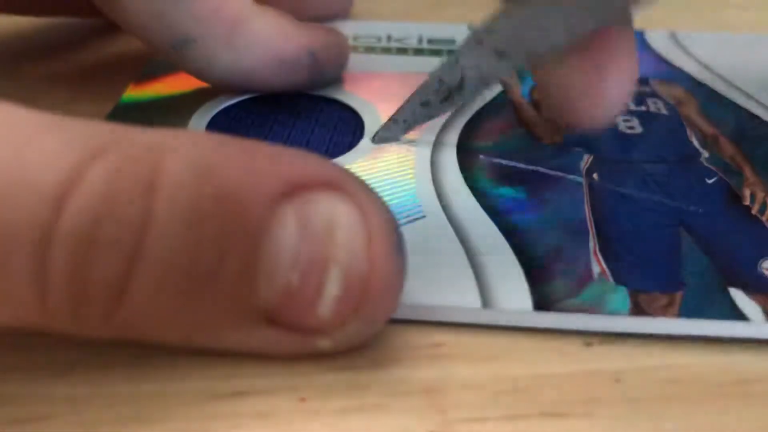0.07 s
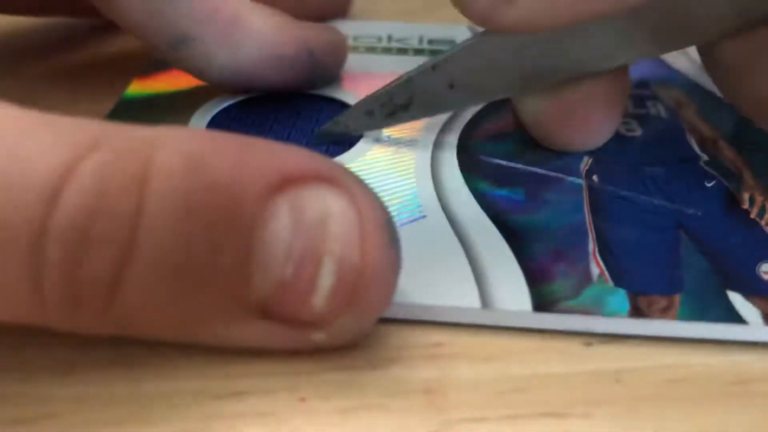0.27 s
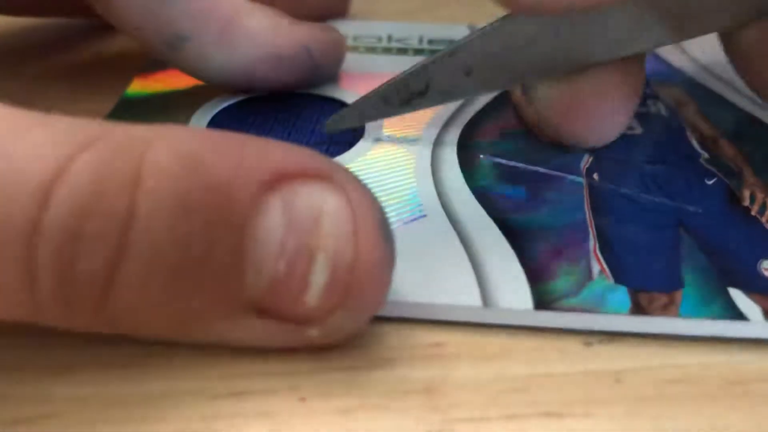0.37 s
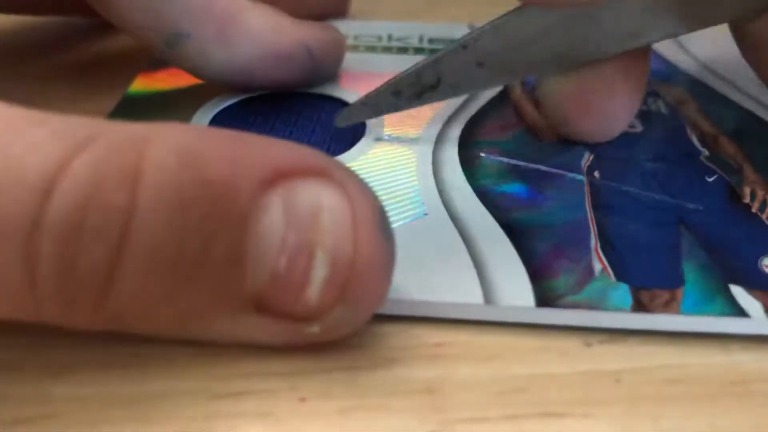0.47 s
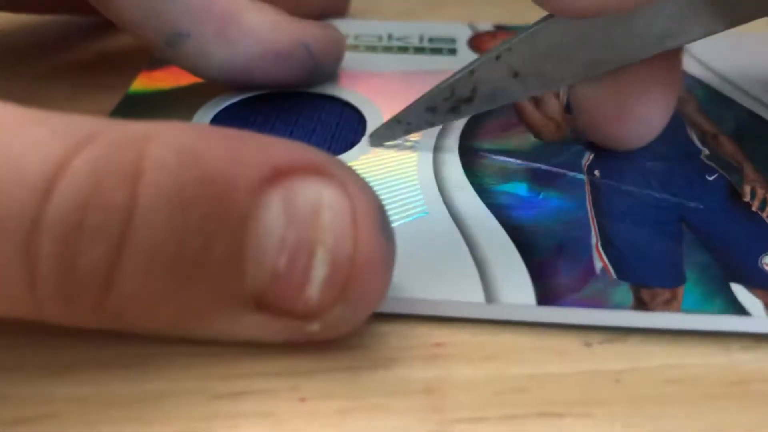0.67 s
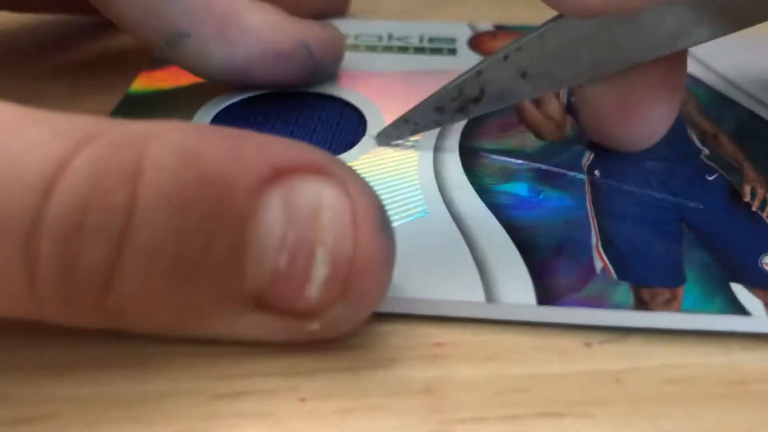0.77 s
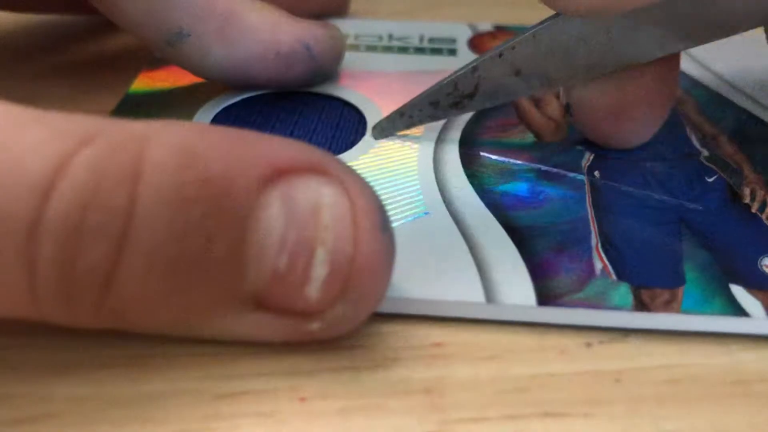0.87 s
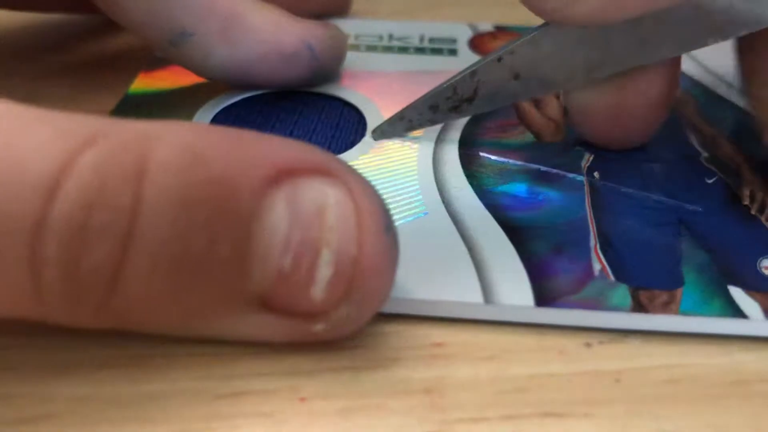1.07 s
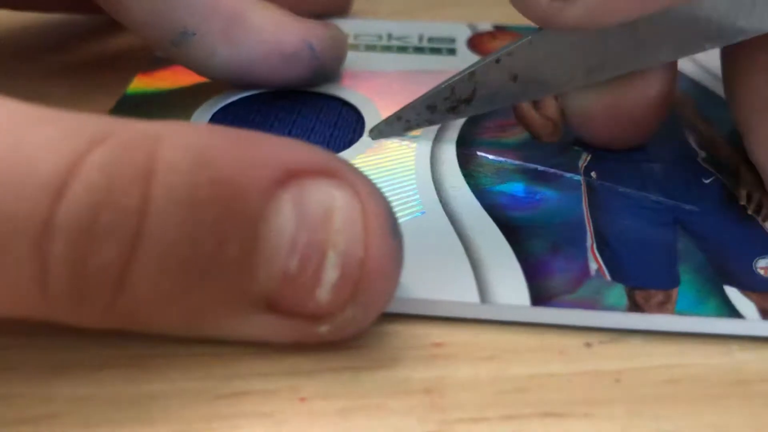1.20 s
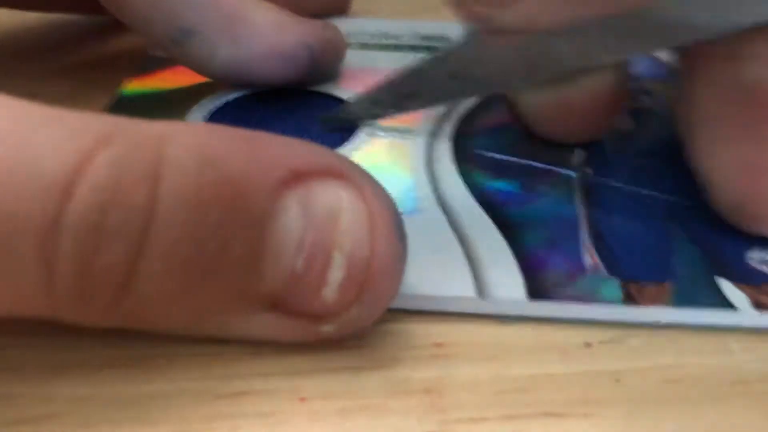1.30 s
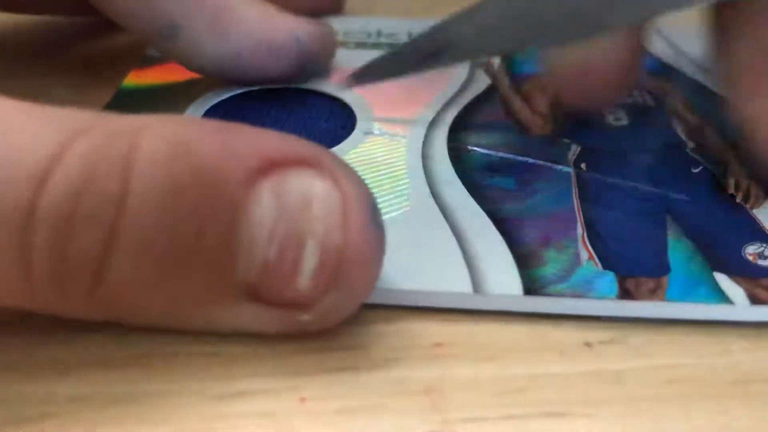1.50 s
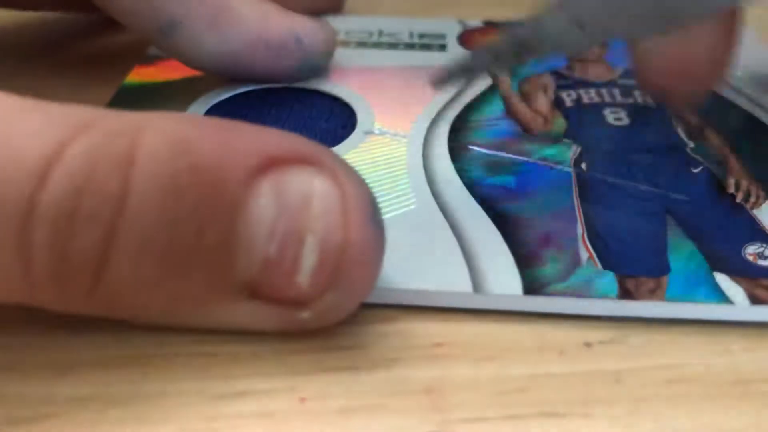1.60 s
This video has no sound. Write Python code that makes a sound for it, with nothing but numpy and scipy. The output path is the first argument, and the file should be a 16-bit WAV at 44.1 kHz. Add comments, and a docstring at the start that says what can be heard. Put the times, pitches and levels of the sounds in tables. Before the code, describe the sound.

Dry clicks and short scrapes of a pointed blade picking at a card on a table.

```python
"""A wooden table in a small room, one microphone close to a stiff trading card held down on it.
A pointed blade scrapes briefly and slides with a faint hiss and tiny metallic ticks. At 0.2 s the tip
catches and lets go in a flurry: the card snaps, clacks and thuds on the table, treble before bass.
A quieter second follows, with a scrape, light catches, ticks and soft nudges of the fingers.
At 1.33 s comes a second flurry, then two last faint scrapes and catches."""
import sys
import numpy as np
from scipy import signal
from scipy.fft import rfft, irfft
from scipy.io import wavfile

SR = 44100
rng = np.random.default_rng(int(sys.argv[2]) if len(sys.argv) > 2 else 0)


def store_pcm(level_fs):
    """Save levels as 16-bit WAV."""
    pcm = np.round(np.clip(level_fs, -1, 1) * 32767).astype(np.int16)
    wavfile.write(sys.argv[1], SR, np.atleast_2d(pcm).T)


N = 72765
TAPS = 4096  # samples in an impulse response
BLOW_GAIN = np.sqrt(0.003 * SR)  # gives a blow of energy one an rms of one over 3 ms


def amp(db):
    """Decibels to gain."""
    return 10 ** (np.asarray(db) / 20)


def curve_at(points, hz):
    """Interpolates a curve on a log-frequency axis."""
    point_hz, value = np.transpose(points)
    return np.interp(np.log(hz + 1), np.log(point_hz + 1), value)


def add(mix, start_s, sound):
    """Mixes a sound in at its time."""
    part = mix[max(round(start_s * SR), 0):][:len(sound)]
    part += sound[:len(part)]


def unit(x):
    """Scales to energy one."""
    return x / np.sqrt(np.sum(x ** 2) + 1e-20)


def impulse(colour):
    """Impulse response with the given colour and no pre-echo."""
    log_gain = np.log(amp(curve_at(colour, abs(np.fft.fftfreq(TAPS, 1 / SR)))))
    return unit(np.fft.ifft(np.exp(np.conj(signal.hilbert(log_gain)))).real)


def noise(colour):
    """Steady noise of rms one with the given colour."""
    gain = amp(curve_at(colour, np.fft.rfftfreq(N, 1 / SR)))
    return unit(irfft(rfft(rng.standard_normal(N)) * gain, N)) * np.sqrt(N)


def ring(modes, sign=1):
    """Damped modes; with a negative sign neighbours move in opposition and the ring swells in."""
    t = np.arange(TAPS) / SR
    return unit(sum(sign ** k * amp(db) * width * np.exp(-np.pi * width * t) * np.sin(2 * np.pi * hz * t)
                    for k, (hz, width, db) in enumerate(modes)))


# Antiresonances of card and table. Each row: frequency in Hz, width in Hz.
DIPS = [(420, 65), (1100, 100)]
def bending_wave(x, band_hz, delay_s=0.001):
    """Bending waves bring the bass late (delay_s holds at 1 kHz); only a band with two dips radiates."""
    hz = np.fft.rfftfreq(2 * TAPS, 1 / SR)
    phase_lag = 4 * np.pi * delay_s * np.sqrt(hz * 1000)
    wave = irfft(rfft(x, 2 * TAPS) * np.exp(-1j * phase_lag))[:TAPS]
    for dip_hz, width in DIPS:
        wave = signal.lfilter(*signal.iirnotch(dip_hz, dip_hz / width, SR), wave)
    return unit(signal.sosfilt(signal.butter(2, band_hz, "band", fs=SR, output="sos"), wave))


# Modes of the table and the card on it. Each row: frequency in Hz, width in Hz, level in dB.
TABLE_MODES = [(147.3, 60, 1.5), (185, 75, 2.5), (276, 67, -1.5), (364, 28, -5)]
CARD_MODES = [(470, 28, -18.5), (520.6, 28, -0.5), (556, 70, -9.5), (617, 120, -5), (727, 65, -2.5),
              (806, 72, 3.5), (887, 50, -2), (1050, 83, -14)]
UPPER_CARD_MODES = [(1162, 40, -12), (1160, 55, -4.5), (1345, 110, -1.5), (1553, 85, 3.5), (1665, 100, -3),
                    (1884, 90, -5.5), (2066, 200, -16), (2670, 67, -19)]
def table_and_card():
    """Three answers to a blow: the table's thud, the card's clack and its upper ring."""
    thud = bending_wave(ring(TABLE_MODES, sign=-0.93), band_hz=(100, 600), delay_s=0.00045)
    clack = bending_wave(ring(CARD_MODES), band_hz=(444, 1306))
    upper = bending_wave(ring(UPPER_CARD_MODES), band_hz=(1100, 2600))
    return [thud, clack, upper]


# The rasp from close by. Each row: frequency in Hz, level in dB.
RASP_COLOUR = [(800, -21.5), (2000, -5.5), (2700, 1.5), (4000, -5), (5000, 3.5), (5800, -3.5), (7200, 2),
               (8800, -5), (11500, -4.5), (13000, -0.5), (14000, -12.5), (16000, -12)]
# Strokes of the tip over the card. Each row: start, length and rise in seconds, then levels in dB
# of thud, clack, upper ring and rasp.
SCRAPES = [(0.0, 0.012, 0.0011, -44.5, -47.5, -63.5, -55), (0.247, 0.038, 0.004, -34.5, -29, -31.5, -45),
           (0.272, 0.062, 0.005, -39, -43, -49.5, -51), (0.477, 0.053, 0.023, -46, -48, -57, -57.5),
           (1.332, 0.074, 0.0042, -42.5, -44, -56, -52.5), (1.483, 0.017, 0.0095, -51.5, -67.5, -71, -81.5),
           (1.535, 0.02, 0.0084, -53, -55.5, -69, -71.5)]
def scrapes(bodies, slips_per_s=5000, spread_db=1.5, grip_db=2, wavers_per_s=300, release_s=0.0095):
    """Dense uneven slips under the tip rasp and drive card and table, while the grip wavers."""
    out, rasp, t = np.zeros(N), impulse(RASP_COLOUR), np.arange(TAPS) / SR
    for start_s, length_s, rise_s, *levels_db in SCRAPES:
        size = amp(spread_db * np.minimum(rng.exponential(1, TAPS), 4))
        slips = (rng.random(TAPS) < slips_per_s / SR) * rng.choice([-1, 1], TAPS) * size
        grip = amp(grip_db * np.interp(t * wavers_per_s, np.arange(TAPS), rng.standard_normal(TAPS)))
        stroke = np.minimum(t / rise_s, 1) * np.clip((length_s - t) / release_s, 0, 1)
        for db, body in zip(levels_db, bodies + [rasp]):
            response = unit(signal.fftconvolve(slips * grip * stroke, body))
            add(out, start_s, amp(db) * np.linalg.norm(stroke) * response)
    return out


# The hiss of sliding. Each row: frequency in Hz, level in dB.
SLIDE_COLOUR = [(50, -9), (150, -12), (300, -3), (450, -16), (700, -10), (1300, -24.5), (3300, -31),
                (5200, -22.5), (7000, -37.5), (16000, -38)]
def slide(level_db=-60, fade_s=0.21):
    """A faint sliding hiss that fades out as the first catches come."""
    fade = np.sqrt(np.clip(1 - np.arange(N) / SR / fade_s, 0, 1))
    return amp(level_db) * noise(SLIDE_COLOUR) * fade


# The background at the microphone. Each row: frequency in Hz, level in dB.
ROOM_TONE_COLOUR = [(25, -19), (45, -8.5), (70, -1), (120, -3), (180, -9), (290, -6), (450, -11.5),
                    (900, -18.5), (1500, -23.5), (3000, -27), (7000, -29.5), (16000, -32.5)]
def room_tone(level_db=-68.5):
    """A quiet, steady rumble under everything."""
    return amp(level_db) * noise(ROOM_TONE_COLOUR)


# The small room around the table. Each row: frequency in Hz, level in dB, seconds to fall by 60 dB.
ROOM_BANDS = [(100, -20.5, 0.55), (200.2, -21, 0.18), (320, -15, 0.6), (800, -19, 0.42), (1300, -18, 0.42),
              (2103, -21.5, 0.52), (3501, -22, 0.39), (7000, -22, 0.32), (15000, -35.5, 0.25)]
def room_reverb(x, build_s=0.024):
    """Reflections build into a diffuse tail, each band with its own level and decay."""
    hz, t, spectrum = signal.stft(rng.standard_normal(SR), SR, nperseg=256)
    level_db, t60 = (curve_at(np.array(ROOM_BANDS)[:, [0, k]], hz)[:, None] for k in (1, 2))
    decay_rate = np.log(1000) / t60
    spectrum = spectrum * amp(level_db) * np.exp(-decay_rate * t) * np.sqrt(2 * decay_rate / SR)
    tail = signal.istft(spectrum, SR, nperseg=256)[1][:SR]
    build = np.minimum(np.arange(SR) / SR / build_s, 1)
    return signal.fftconvolve(x, tail * build)[:N]


def crack(db, snap_decay_s=0.00026, rattle_decay_s=0.004, full_snap_db=-25):
    """A burst of tiny fractures; the harder it is, the more the card rattles afterwards."""
    t = np.arange(1024) / SR
    rattle = amp(-15.5 + 0.26 * (db - full_snap_db))
    envelope = np.exp(-t / snap_decay_s) + rattle * np.exp(-t / rattle_decay_s)
    return amp(db) * unit(rng.standard_normal(len(t)) * envelope)


# Modes of the steel tip. Each row: frequency in Hz, width in Hz, level in dB.
TIP_MODES = [(3940, 900, -22), (6098, 560, 8), (7000, 830, -30.5)]
# The fizz on a tick. Each row: frequency in Hz, level in dB.
FIZZ_COLOUR = [(3000, -39), (8000, -18.5), (11000, -10), (14000, 0), (16000, -5)]
# Ticks, close and dry. Each row: start in seconds, ring level in dB, fizz level in dB.
TICKS = [(0.0387, -67, -60), (0.0702, -69.5, -65), (0.1138, -72, -66.5), (0.192, -62.5, -60),
         (0.227, -64, -50), (0.3678, -75, -78), (0.3775, -84, -70.5), (0.4000, -63, -56),
         (0.6673, -70, -80), (0.8959, -70, -66.5), (0.9043, -58, -69), (0.9056, -42.5, -56.5),
         (0.9126, -61, -62.5), (1.027, -75, -80.5), (1.1654, -75, -71), (1.1830, -65.5, -64),
         (1.2898, -68.5, -67), (1.3012, -77, -69), (1.3092, -72.5, -73.5), (1.3241, -58, -51)]
def ticks(low_hz=4500):
    """The steel tip rings for a few milliseconds, with a tiny fizz on top."""
    rings, cracks = np.zeros(N), np.zeros(N)
    highpass = signal.butter(2, low_hz, "high", fs=SR, output="sos")
    tip = unit(signal.sosfilt(highpass, ring(TIP_MODES)))
    for start_s, ring_db, fizz_db in TICKS:
        add(rings, start_s, amp(ring_db) * tip)
        add(cracks, start_s, crack(fizz_db))
    fizz = signal.oaconvolve(cracks, impulse(FIZZ_COLOUR))[:N]
    return (rings + fizz) * BLOW_GAIN


# The blade ringing on after a snap. Each row: frequency in Hz, width in Hz, level in dB.
BLADE_MODES, BLADE_DB = [(6110, 40, -0.5), (7260, 70, -4), (9000, 200, -0.5)], -12.5
# The snap of the card's surface from close by. Each row: frequency in Hz, level in dB.
SNAP_COLOUR = [(800, -28), (2000, -7), (2900, -5), (3400, 2), (4200, -6.5), (5000, -2), (5600, -9.5),
               (6500, 3), (7600, -3), (8800, 1), (10400, -7), (11800, -11.5), (13200, -6.5), (16000, -13.5)]
# Catches of the tip. Each row: start in seconds, then levels in dB of thud, clack, upper ring and snap.
CATCHES = [(0.2016, -25.5, -23, -27.5, -30.5), (0.2043, -33, -33, -34, -39.5),
           (0.2465, -19, -19, -22, -21.5), (0.2495, -34.5, -26.5, -24.5, -52),
           (0.2533, -19.5, -26, -30, -37.5), (0.2618, -18, -24.5, -26, -30), (0.2660, -35.5, -24, -38, -34),
           (0.2703, -12, -13, -21.5, -41), (0.2808, -23.5, -43, -50, -58),
           (0.314, -36.5, -35.5, -55.5, -55), (0.3316, -47.5, -42, -47, -69), (0.668, -61, -77, -86.5, -82),
           (0.9051, -45.5, -63.5, -63, -53.5), (1.0877, -56.5, -79.5, -85.5, -74.5),
           (1.1705, -46.5, -54, -62, -49), (1.333, -19.5, -25.5, -39, -40),
           (1.3487, -27.5, -63, -57.5, -49), (1.3578, -24.5, -37, -50, -55), (1.3704, -33, -44, -54, -70),
           (1.388, -26.5, -72, -56, -47.5), (1.5120, -47, -61, -75, -71), (1.54, -43.5, -50.5, -70, -78.5)]
def catches(bodies):
    """Each catch cracks at the surface, rings the blade and knocks the card and the table."""
    knocks, cracks = np.zeros(N), np.zeros(N)
    blade = amp(BLADE_DB) * ring(BLADE_MODES)
    for start_s, *body_db, snap_db in CATCHES:
        add(cracks, start_s, crack(snap_db))
        add(knocks, start_s, amp(body_db) @ bodies + amp(snap_db) * blade)
    snaps = signal.oaconvolve(cracks, impulse(SNAP_COLOUR))[:N]
    return (knocks + snaps) * BLOW_GAIN


# Low modes of the nudged table. Each row: frequency in Hz, width in Hz, level in dB.
NUDGE_MODES = [(70, 24, 3), (122, 45, 0), (220, 68, -5.5)]
# Soft nudges of the fingers. Each row: start in seconds, level in dB.
NUDGES = [(0.429, -46.5), (0.672, -61.5), (0.742, -66.5), (0.915, -51.5), (1.03, -53)]
def nudges():
    """Fingers shift on the table with a dull bump."""
    out, bump = np.zeros(N), bending_wave(ring(NUDGE_MODES), band_hz=(53.3, 400))
    for start_s, db in NUDGES:
        add(out, start_s, amp(db) * bump)
    return out * BLOW_GAIN


def scene():
    """Blade, card and table close up in mono, with the small room behind them."""
    bodies = table_and_card()
    direct = catches(bodies) + scrapes(bodies) + nudges()
    return (direct + slide() + room_reverb(direct) + ticks() + room_tone())[None]


def record(dry, edge_hz=16200):
    """The microphone's signal, cut off above the top treble."""
    lowpass = signal.firwin(255, edge_hz, window=("kaiser", 9), fs=SR)
    return signal.oaconvolve(dry, lowpass[None], "same")


dry = scene()
out = record(dry)
store_pcm(out)
```